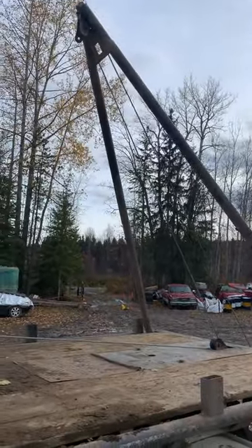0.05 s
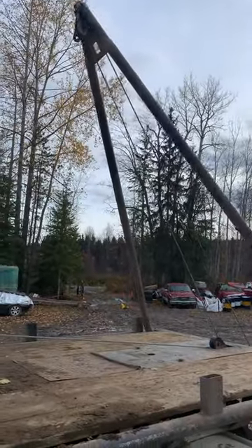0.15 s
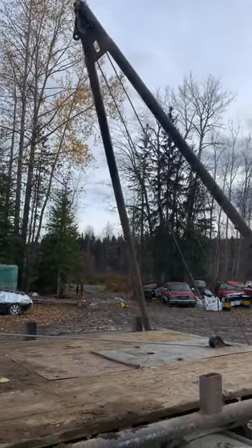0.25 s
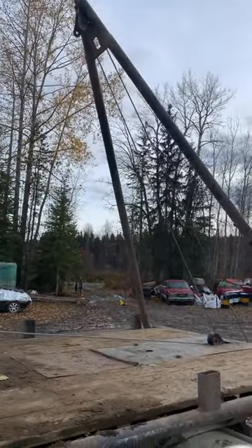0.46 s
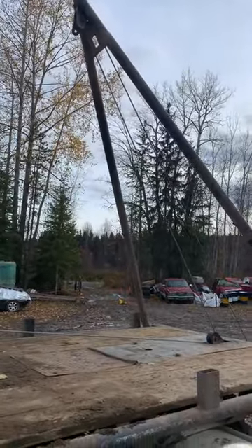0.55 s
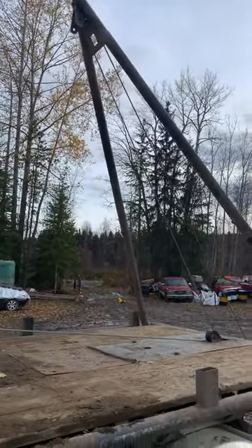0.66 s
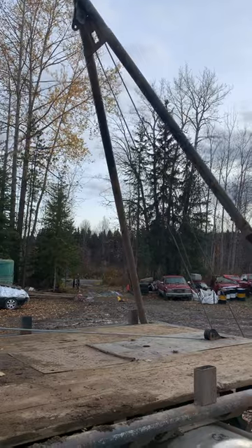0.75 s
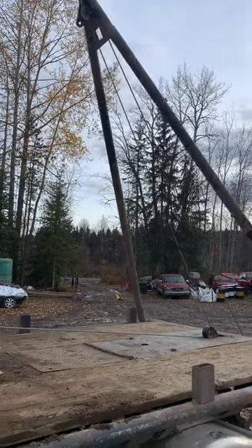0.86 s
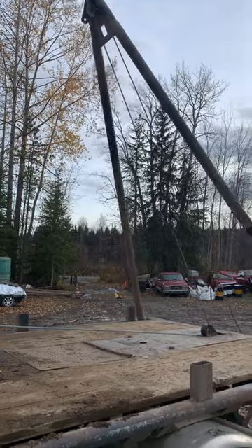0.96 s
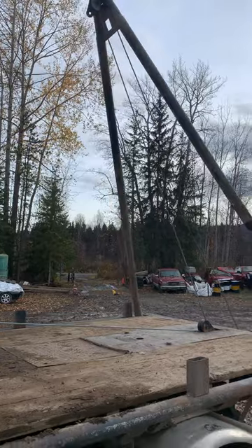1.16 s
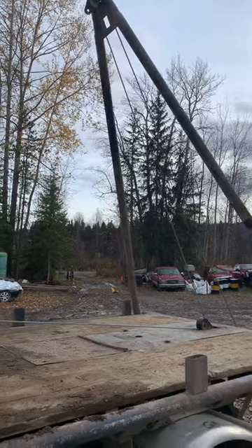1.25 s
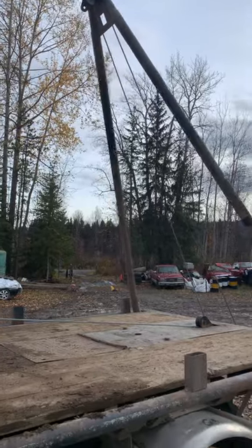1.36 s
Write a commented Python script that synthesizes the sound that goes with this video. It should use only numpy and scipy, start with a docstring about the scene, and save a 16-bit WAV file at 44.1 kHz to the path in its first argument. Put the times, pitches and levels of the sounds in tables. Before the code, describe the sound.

Steel rigging on a truck gives a short clack, a light tick, then a brief harsh grinding rattle with hollow knocks through the plank deck. An engine rumbles low underneath in an open yard.

```python
"""In an open yard, on the plank deck of a winch truck, a steel part takes up its slack with a short clack:
a quick run of impacts excites its modes. A catch ticks, then the part grinds along for a quarter of a
second by stick-slip friction, knocking as it goes and driving the deck into a boom.
An engine rumbles low underneath with the hum of the yard and a faint, fading whine.
The planks add close reflections, and the trees send back a faint wash."""
import sys
import numpy as np
from scipy import signal
from scipy.fft import rfft, irfft, next_fast_len
from scipy.io import wavfile

SR = 44100
rng = np.random.default_rng(int(sys.argv[2]) if len(sys.argv) > 2 else 0)


def bounce(signal):
    """Save signal as a 16-bit WAV file at the path given by the first command-line argument."""
    frames = np.transpose(np.atleast_2d(signal))
    limited = np.clip(frames, -1, 1)
    pcm = np.round(limited * 32767).astype(np.int16)
    wavfile.write(sys.argv[1], SR, pcm)


N = 61739
T = np.arange(N) / SR
FFT_SIZE = next_fast_len(2 * N, True)
HZ = np.maximum(np.arange(FFT_SIZE // 2 + 1) * SR / FFT_SIZE, 1)


def from_db(db):
    """Amplitude ratio: a factor of ten per 20 dB."""
    return 10 ** (np.asarray(db) / 20)


def unit_rms(x):
    """Normalisation to unit mean power."""
    return x / np.sqrt(np.mean(x ** 2) + 1e-20)


def envelope(rows):
    """Amplitude envelope through (time [s], level [dB]) rows, silent outside them."""
    times, db = np.transpose(rows)
    return from_db(np.interp(T, times, db)) * (T >= times[0]) * (T <= times[-1])


def dying(start, decay_s):
    """Exponential decay after a sudden onset."""
    return (T >= start) * np.exp(-np.maximum(T - start, 0) / decay_s)


def over_hz(rows):
    """Interpolation along logarithmic frequency."""
    hz, value = np.transpose(rows)
    return np.interp(np.log(HZ), np.log(hz), value)


def through(x, response):
    """Convolution as a product of spectra."""
    return irfft(rfft(x, FFT_SIZE) * response, FFT_SIZE)[..., :N]


def band_limit(x, order, hz, kind="low"):
    """Filtering with a maximally flat passband."""
    return signal.sosfilt(signal.butter(order, hz, kind, fs=SR, output="sos"), x + 1e-18)


def colour(x, spectrum):
    """Minimum-phase filtering that keeps the power of white noise."""
    cepstrum = irfft(np.log(unit_rms(from_db(over_hz(spectrum)))), FFT_SIZE)
    cepstrum[1:FFT_SIZE // 2] *= 2  # folding onto positive time makes it causal
    cepstrum[FFT_SIZE // 2 + 1:] = 0
    return through(x, np.exp(rfft(cepstrum)))


def lag_right(pair, lag):
    """Interchannel phase difference: the right channel lags by a frequency-dependent angle."""
    phase = np.interp(HZ, *np.transpose(lag))
    return np.array([pair[0], through(pair[1], np.exp(-1j * phase))])


def ring(x, hz, t60):
    """Damped oscillator: a unit impulse starts a decaying sine of unit height."""
    radius, angle = 10 ** (-3 / (t60 * SR)), 2 * np.pi * hz / SR
    return signal.lfilter([0, np.sin(angle)], [1, -2 * radius * np.cos(angle), radius ** 2], x + 1e-18)


def strike(hits, modes, tilt_db=0, scatter_db=0.7):
    """Modal superposition: each impact excites every mode, with random scatter and a tilt per octave."""
    times, db = np.transpose(hits)[:2]
    octaves = np.log2(np.transpose(modes)[0])
    tilt = np.outer(tilt_db, octaves - octaves.mean())
    strengths = from_db(db[:, None] + tilt + scatter_db * rng.standard_normal(tilt.shape))
    motion = np.zeros(N)
    for k, (hz, mode_db, t60) in enumerate(modes):
        impulses = np.bincount((times * SR).astype(int), strengths[:, k], N)
        motion += (-1) ** k * from_db(mode_db) * ring(impulses, hz, t60)
    return motion


def resonate(x, modes):
    """Forced vibration: each mode keeps the power of white noise before its own gain."""
    return sum((-1) ** k * from_db(db) * ring(x, hz, t60) * np.sqrt(4 * np.log(1000) / (t60 * SR))
               for k, (hz, db, t60) in enumerate(modes))


def burst(shape, treble_db, shelf_hz=2450):
    """Crushing contact radiates broadband noise, here under an envelope and a treble shelf."""
    noise = rng.standard_normal(N) * shape
    low = band_limit(noise, 1, shelf_hz)
    return low + from_db(treble_db) * (noise - low)


def clack():
    """Impact excitation: each contact cracks, shudders through loose rigging and rings the steel."""
    # a quick run of contacts, then one opening the slide: (time [s], level [dB], treble [dB])
    blows = [(0.2148, -11.5, -9), (0.2179, -12, -18), (0.2295, -9, -10), (0.2356, -11, -4), (0.2381, 3, -3),
             (0.2406, -7, -12), (0.2455, -6, -13), (0.2867, -33, 7.5), (0.5232, -11, -14)]
    # modes of the steel part: (frequency [Hz], level [dB], T60 [s])
    steel_modes = [(812, 4, .048), (965, -4, .055), (1052, -6, .055), (1180, -14, .06), (1415, -12, .05),
                   (1605, 1, .033), (1880, -3, .045), (2110, -5, .055), (3090, -14, .045), (3420, -14, .04),
                   (3800, -10, .035), (5790, -11, .028), (6700, -10, .035)]
    # contact noise: (frequency [Hz], spectral level [dB])
    crack_spectrum = [(50, -36), (200, -12), (680, -11), (900, -2), (1900, -1), (2500, -12), (3600, -8),
                      (4800, -12), (6800, -9), (11000, -19), (14500, -41)]
    crack_s, shudder_s = 0.0027, 0.015
    cracks = np.zeros(N)
    for start, db, treble_db in blows:
        shape = dying(start, crack_s) + from_db(-12.5) * dying(start, shudder_s)
        cracks += from_db(db) * burst(shape, treble_db)
    return from_db(-18.5) * colour(cracks, crack_spectrum) + from_db(-26.5) * strike(blows, steel_modes)


def stick_slip(slips_per_s=3200, spread_db=3):
    """Stick-slip friction: a dense random train of tiny impulses of uneven size."""
    sizes = from_db(spread_db * np.minimum(rng.exponential(1, N), 4))
    signs = rng.choice([-1, 1], N)
    return unit_rms(sizes * signs * (rng.random(N) < slips_per_s / SR))


def grinding(slips):
    """Friction noise: the slips grow louder with the contact pressure."""
    # pressure of the slide: (time [s], level [dB])
    pressure = [(0.512, -14), (0.519, -4), (0.524, -6), (0.540, 2.5), (0.600, 2.5), (0.635, 5.5),
                (0.660, 2), (0.700, 1), (0.714, -3.5), (0.735, -1), (0.768, -8), (0.795, -21), (0.850, -36)]
    # grinding steel: (frequency [Hz], spectral level [dB])
    spectrum = [(70, -48), (150, 5), (300, -4.5), (550, -4), (800, 4.5), (1200, 0), (1900, -4.5),
                (2400, -9), (4000, -0.5), (6500, -12.5), (9000, -11), (11500, -31.5), (14500, -59)]
    return from_db(-36) * colour(slips * envelope(pressure), spectrum)


def groans(slips, t60=0.04):
    """Friction-driven resonance: as the contact moves, one rough pitch after another swells and fades."""
    # brief resonances: (start [s], end [s], frequency [Hz], level [dB])
    resonances = [(0.512, 0.619, 806, -39.5), (0.526, 0.657, 556, -46.5), (0.62, 0.692, 1206, -48),
                  (0.639, 0.747, 744, -43), (0.708, 0.766, 1852, -38.5)]
    sound = np.zeros(N)
    for start, end, hz, db in resonances:
        swell = np.sin(np.pi * np.clip((T - start) / (end - start), 0, 1))
        sound += resonate(slips * swell, [(hz, db, t60)])
    return sound


def snags():
    """Transient friction: each snag is a noise burst with a linear rise and an exponential decay."""
    # snags along the slide: (time [s], level [dB], treble [dB], rise [s], decay [s])
    events = [(0.52, -18, -6, 0.0032, 0.0048), (0.612, -40, -8, 0.0011, 0.00095),
              (0.627, -36, 12, 0.0017, 0.0042), (0.631, -36, 9.5, .002, 0.011),
              (0.7164, -35, 13.5, .006, 0.01), (0.755, -31.5, 0.5, 0.0058, 0.0086)]
    # snag noise: (frequency [Hz], spectral level [dB])
    spectrum = [(90, -45), (400, -10.5), (1000, 5), (1400, -8.5), (3200, -6), (5000, -7), (8000, -13),
                (11000, -13.5), (15000, -27)]
    bursts = np.zeros(N)
    for start, db, treble_db, rise_s, decay_s in events:
        shape = dying(start, decay_s) * np.clip((T - start) / rise_s, 0, 1)
        bursts += from_db(db) * burst(shape, treble_db)
    return colour(bursts, spectrum)


def deck_boom(slips):
    """Sounding-board action: thumps ring all modes of the deck, and slips drive all but the deepest."""
    # modes of the deck: (frequency [Hz], level [dB], T60 [s])
    modes = [(76, -2, .14), (135, 0, .22), (192, -3, .14), (250, -3, .15), (312, -4, .17), (435, -7, .09),
             (540, -9, .06)]
    # knocks under the clack and the slide: (time [s], level [dB], tilt [dB/octave])
    thumps = [(0.2417, -37, 10), (0.5215, -47, 5), (0.647, -38, -2.5), (0.66, -46.5, -4.5),
              (0.6829, -39, -1), (0.7451, -44.5, -4.5), (0.7666, -40.5, 0.5)]
    # drive from the slide: (time [s], level [dB])
    shaking = [(0.52, -70), (0.555, -44.5), (0.63, -45.5), (0.69, -53.5), (0.77, -53), (0.81, -51.5)]
    struck = strike(thumps, modes, tilt_db=np.transpose(thumps)[2])
    driven = resonate(slips * envelope(shaking), modes[1:])
    return band_limit(struck + driven, 4, 60, "high")


def catch():
    """Damped free vibration: a small hard catch ticks, its slightly soft contact limiting the treble."""
    # one tick and a far fainter one: (time [s], level [dB])
    ticks = [(0.4990, -23.5), (1.262, -63)]
    # modes of the catch: (frequency [Hz], level [dB], T60 [s])
    modes = [(2920, -3, .011), (4110, -3, .010), (4800, -11, .007), (6070, -10, .008), (7330, -9, .008),
             (9000, -7, .008)]
    return band_limit(strike(ticks, modes), 4, 11000)


def hiss():
    """Amplitude-modulated noise: a light hiss between clack and slide."""
    # swell of the hiss: (time [s], level [dB])
    levels = [(0.28, -82), (0.33, -57.5), (0.39, -60), (0.47, -71.5), (0.51, -67)]
    # its colour: (frequency [Hz], spectral level [dB])
    spectrum = [(800, -27), (2500, -7), (4000, -0.5), (6500, -2.5), (8500, -24), (15000, -35.5)]
    return envelope(levels) * colour(rng.standard_normal(N), spectrum)


def reflections(x, planks_t60=0.039, trees_t60=0.51):
    """Reverberation: close reflections from the planks and a diffuse tail from trees and parked cars."""
    planks = from_db(-8) * unit_rms(from_db(-60 * T / planks_t60))
    trees = from_db(-18) * unit_rms(from_db(-60 * T / trees_t60))
    mid, side = rng.standard_normal((2, N)) * (planks + trees) / np.sqrt(N)
    side = from_db(-0.5) * band_limit(side, 2, [300, 2760], "band")  # wide mids, narrow treble
    response = band_limit(mid + side * [[1], [-1]], 1, [120, 4800], "band")
    return through(x, rfft(response, FFT_SIZE))


def engine():
    """Low-frequency noise with slow amplitude modulation: the rumble of the engine."""
    # rumble: (frequency [Hz], spectral level [dB])
    spectrum = [(20, -31), (32, -28), (48, 3.5), (90, 1), (130, -6), (200, -12.5), (400, -30.5),
                (1000, -59)]
    # its drift: (time [s], level [dB])
    levels = [(0, -59), (0.1, -53.5), (0.45, -56), (0.82, -53.5), (0.93, -50.5), (1.08, -55), (1.2, -55),
              (1.45, -55)]
    rumble = through(rng.standard_normal(N), from_db(over_hz(spectrum)))
    return envelope(levels) * unit_rms(rumble)


def yard_hum():
    """Partially coherent noise: the broad hum of the yard is only partly alike on the two sides."""
    # ambient noise: (frequency [Hz], spectral level [dB])
    spectrum = [(100, -6.5), (220, -14.5), (305, -1), (420, -12), (700, 0), (1200, -6), (1600, -10),
                (2200, -25), (3000, -32), (4200, -40.5), (7000, -43), (11000, -44.5), (15000, -54.5)]
    # left-right likeness: (frequency [Hz], correlation [1])
    likeness = [(60, 0.78), (290, .85), (640, 0.3), (1400, 0.27), (3000, 0.18), (4700, 0.77), (10000, 0.58)]
    correlation = over_hz(likeness)
    mid = through(rng.standard_normal(N), np.sqrt((1 + correlation) / 2))
    side = through(rng.standard_normal(N), np.sqrt((1 - correlation) / 2))
    return from_db(-53) * colour(mid + side * [[1], [-1]], spectrum)


def whine(t60_cycles=7.3):
    """Resonant filtering: noise through pairs of resonators gives a faint metallic whine that fades."""
    # bands of the whine: (frequency [Hz], level [dB])
    bands = [(1380, -3.5), (1620, -4), (1940, -7.5), (3060, -19.5), (3580, -8), (4100, -10.5)]
    fade = [(0, -59.5), (0.2, -59), (0.5, -63), (0.9, -102)]  # (time [s], level [dB])
    sound = np.zeros(N)
    for hz, db in bands:
        t60 = t60_cycles / hz
        band = ring(rng.standard_normal(N), hz, t60)
        sound += from_db(db) * unit_rms(ring(band, hz, t60))
    return from_db(np.interp(T, *np.transpose(fade))) * sound


def scene():
    """Superposition of all sources, widened by a fixed stereo phase filter that lags the right channel."""
    # stereo phase filter, lag of the right channel: (frequency [Hz], phase [rad])
    widening_lag = [(0, 0), (1600, 0), (2400, 2.7), (2900, 0.6), (3600, 1.6), (4400, 3.08), (5100, 3.2),
                    (6300, 6.2), (7300, 6.4), (8700, 9.3), (9500, 9.55), (10400, 12.4), (11500, 12.7),
                    (12600, 15.6), (13800, 15.8), (14500, 18.8)]
    # extra lag for the slide, which lies further left: (frequency [Hz], phase [rad])
    slide_lag = [(0, 0), (260, 0.53), (600, 1.13), (1100, 1.35), (1800, 0.66), (2400, 0), (2900, 1.33),
                 (4300, 0.16)]
    rigging = hiss() + clack() + catch()
    slips = stick_slip()
    slide = grinding(slips) + groans(slips) + snags()
    direct = rigging + lag_right([slide, slide], slide_lag) + deck_boom(slips)
    ambience = reflections(rigging + slide) + engine() + yard_hum() + whine()
    return lag_right(direct + ambience, widening_lag)


def record(dry, low_cut_hz=34, high_cut_hz=15600):
    """Band limiting: the deepest bass is rolled off and the top is cut steeply."""
    thinned = band_limit(dry, 4, low_cut_hz, "high")
    return signal.sosfilt(signal.ellip(10, .2, 80, high_cut_hz, fs=SR, output="sos"), thinned)


dry = scene()
out = record(dry)
bounce(out)
```